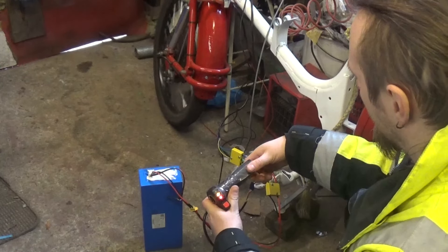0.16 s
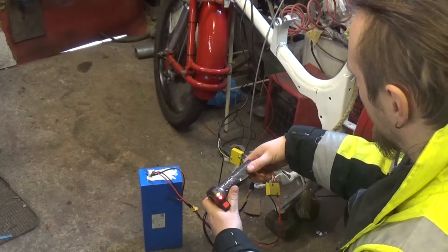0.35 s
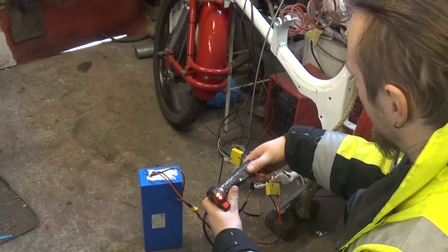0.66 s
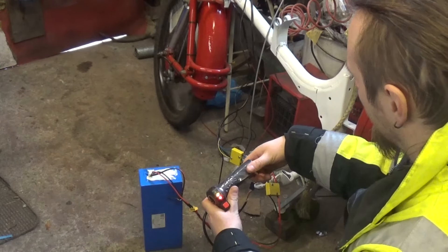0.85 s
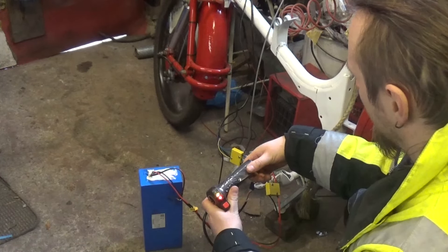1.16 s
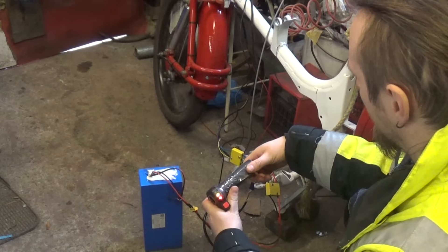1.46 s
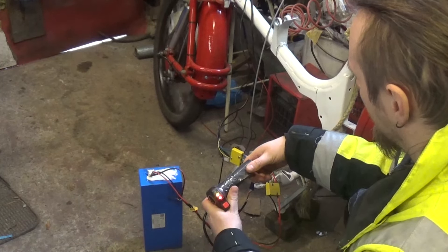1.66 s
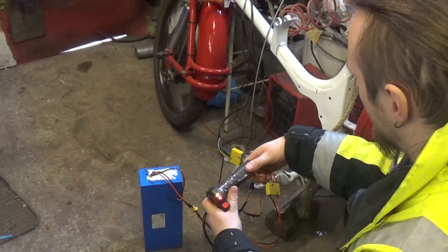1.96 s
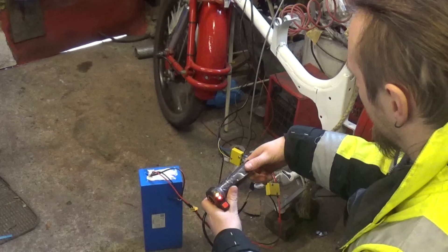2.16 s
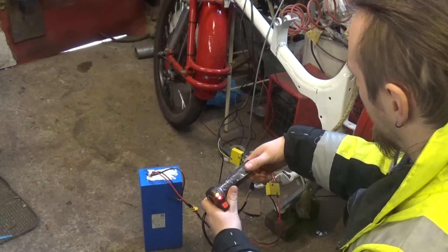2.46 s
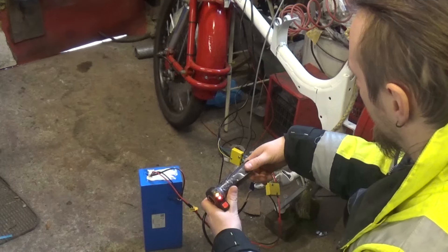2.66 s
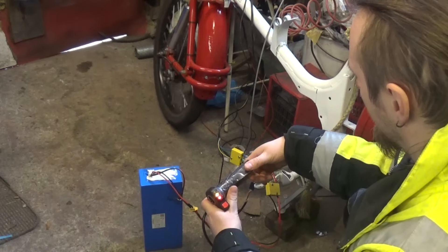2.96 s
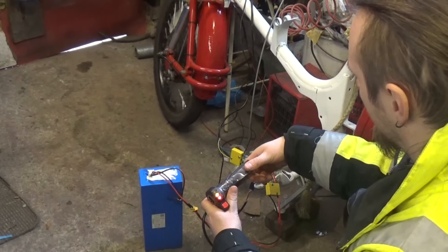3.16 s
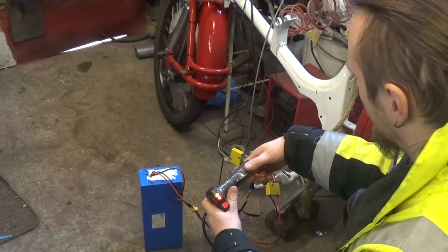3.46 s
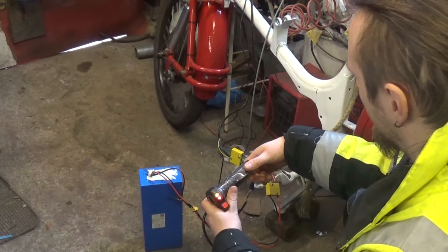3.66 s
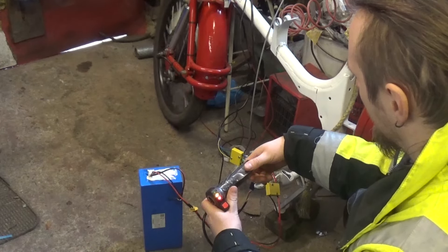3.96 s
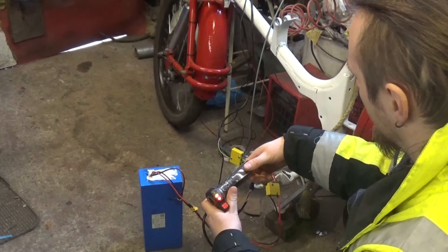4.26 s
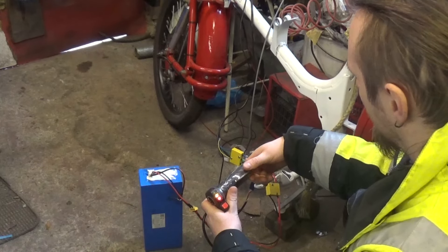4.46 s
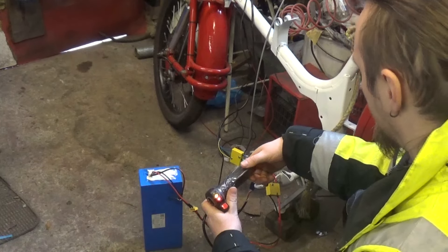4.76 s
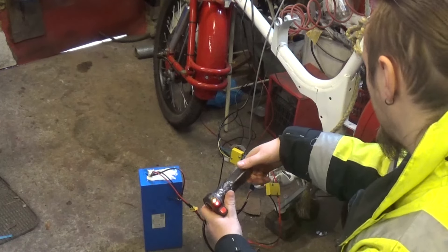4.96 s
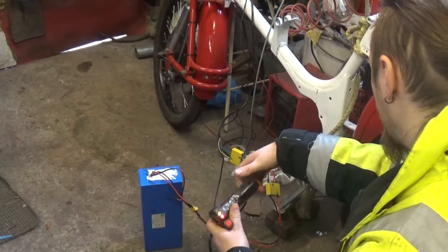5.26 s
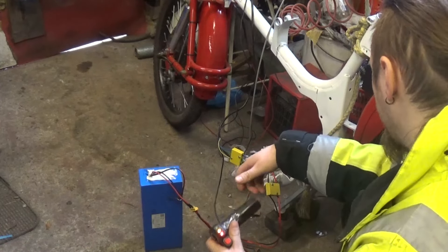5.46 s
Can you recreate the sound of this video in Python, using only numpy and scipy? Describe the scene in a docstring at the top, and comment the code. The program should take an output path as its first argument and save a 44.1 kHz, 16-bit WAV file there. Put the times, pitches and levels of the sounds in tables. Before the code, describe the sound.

An electric wheel motor ticks over quickly and drily, then surges into a loud, metallic growl whose pitch wavers up and down for under two seconds. It falls back to slower, uneven knocking with fine rattle, speeds up slightly, then stops with a dull scrape and two hollow taps. Soft jacket rustle and small crackles follow. Close microphone, small workshop with short reverberation.

```python
"""Slow ticking comes first: an electric wheel motor on a workshop stand, its drive knocking once per step.
A twisted throttle revs it into a wavering growl. Knocks and grinding ring the frame, a fine metallic
rattle rings the hub cover, and the wheel's two main resonances sing over a low rumble.
With the drive off, the wheel scrapes as it runs down and its last two knocks ring hollow; then a jacket
rustles and crackles in the quiet room. Clicks and noise through resonators make the machine."""
import sys
import numpy as np
from scipy import signal
from scipy.fft import rfft, irfft
from scipy.io import wavfile
from scipy.ndimage import uniform_filter1d

SR = 44100
rng = np.random.default_rng(int(sys.argv[2]) if len(sys.argv) > 2 else 0)


def log_audio(samples):
    """Write samples as a 16-bit WAV file to the path given in sys.argv[1]."""
    # one column per channel
    frames = np.atleast_2d(samples).T
    # limit to full scale, then quantise
    limited = np.clip(frames, -1, 1)
    pcm = np.round(limited * 32767).astype(np.int16)
    wavfile.write(sys.argv[1], SR, pcm)


N = 247842

# Drive speed in stretches, the count of steps restarting with each: (time [s], knock rate [1/s])
DRIVE_SPEED = [
    [(.028, 30.7), (.22, 31.9), (.315, 60), (.402, 98.5), (.466, 107.3), (.562, 120), (.632, 97.1),
     (.68, 91), (.728, 91.5), (.81, 115.7), (.858, 122.3), (.9, 123.6), (.95, 123), (1.022, 130),
     (1.18, 101.5), (1.225, 98.4), (1.26, 99), (1.295, 97.8), (1.335, 99.8), (1.41, 96.9), (1.456, 99),
     (1.535, 113), (1.691, 100), (1.77, 97.5), (1.86, 94), (1.919, 90.8), (2.029, 95.6), (2.204, 41),
     (2.4, 25.5)],
    [(2.54, 25.2), (2.7, 24.4), (2.94, 25.9), (3.557, 26), (3.66, 31.5), (3.942, 39)],
    [(3.942, 39), (4.281, 26), (4.47, 18)],
]
# Motor loudness before trims and dips: (time [s], frame level [dB], rattle level [dB])
MOTOR_LEVELS = [(0.0, -35, -33), (0.21, -37.5, -33), (0.43, -23, -27), (0.57, -18.5, -25), (0.72, -23, -25),
                (0.85, -19.5, -26), (1.75, -17.5, -24), (2.15, -28, -26.5), (2.25, -38, -32),
                (2.57, -38, -33.5), (2.64, -35.5, -33), (3.7, -37, -33.5), (3.87, -41, -34),
                (4.02, -35.5, -31.5), (4.48, -38, -33.5), (4.53, -58, -57.5), (4.6, -61, -44.5),
                (4.65, -68, -68), (4.8, -72.5, -80)]
# Single hard knocks: (time [s], blow on the frame [dB], dry snap [dB], cover shake [dB])
HARD_KNOCKS = [(0.497, 11, 25, -37), (0.86, 17, 1, -26), (0.986, 6, 24, -43), (2.03, 17.5, 22, -38),
               (2.823, 3, 13, -34), (2.863, 3, 12, -34), (3.741, 13, 19, -27), (2.939, -14, 9, -33.5),
               (3.13, 6, 6, -40), (3.287, 8, 7, -40), (3.365, -2, 11.5, -45), (3.724, 2, 1, -35),
               (3.782, 0, -13, -36), (3.967, 5, 5, -38), (3.995, 0, -11, -36), (4.141, 7.5, -4, -34),
               (4.434, 3, 6, -35), (4.55, -19, -20, -45.5), (4.591, -19, -17, -53), (4.711, -19, -24, -64)]
# Frame and wheel resonances: (frequency [Hz], width [Hz], relative level [dB])
FRAME_MODES = [(651, 32, -3.5), (755, 35.6, 0), (901, 30, -2.5), (965, 35, -4.5), (1135, 46, -5),
               (1318, 72, -6), (1494, 32.5, -2.5), (1718, 72, -3), (1780, 72, -8), (1888, 51, -4.5),
               (2060, 91, -11)]
# Hub cover resonances: (frequency [Hz], width [Hz], relative level [dB])
HUB_MODES = [(2380, 930, -4.5), (3150, 64, 2), (3293, 17, 3), (3662, 235, 2.5), (4255, 280, 2),
             (4617, 152, 6.5), (5250, 190, 4.5), (5680, 180, 7.5), (5960, 950, 2.5), (6955, 320, 5),
             (7010, 47, 11), (7426, 170, 4.5), (7890, 550, -1), (8860, 710, 1), (10040, 450, -4),
             (10870, 230, -5.5)]
# Dry snap coming back from nearby panels: (delay [ms], level [dB])
PANEL_ECHOES = [(5.5, -7), (10.9, -10)]
# Jacket crackles, peaks before the room: (time [s], peak level [dB], frequency [Hz], decay [ms])
JACKET_CRACKLES = [(4.828, -31, 10000, 0.5), (4.832, -39.5, 5500, 0.55), (4.906, -36, 9430, 1.9),
                   (4.979, -38, 6800, .6), (5.0157, -45, 8500, .6), (5.0454, -41, 7600, .6),
                   (5.058, -33, 9500, .6), (5.095, -37, 7760, 2.1), (5.113, -35, 8100, .8),
                   (5.123, -41, 7660, 1.4), (5.1393, -26.5, 8500, 0.49), (5.168, -37, 6120, 1.5),
                   (5.189, -40, 10200, .6), (5.378, -38, 8500, .6), (5.385, -38, 2960, 3.4)]
# Spectrum of room hiss and jacket rustle: (frequency [Hz], relative level [dB])
RUSTLE_SPECTRUM = [(24, -46.5), (40, -40), (93, -20.5), (569, -3), (829, -7), (1020, -4), (1210, -4.5),
                   (7210, -8), (11000, -15.5)]
# Spectrum of the wheel's rumble: (frequency [Hz], relative level [dB])
RUMBLE_SPECTRUM = [(24, -74.5), (40, -34.5), (91, -31.5), (184, -10.5), (302, -10.5), (356, -3), (437, 0),
                   (470, -2), (610, -65.5), (1030, -120)]
# Dry snap at the start of each knock: (frequency [Hz], width [Hz], level [dB])
SNAP_MODE = [(1400, 1200, -10)]
# Brief level dips, about twice a second under load: (time [s], depth [dB])
LOAD_DIPS = [(0.524, 5.5), (0.999, 6), (1.504, 7.5), (2.064, 4)]
# The wheel's two main resonances: (frequency [Hz], width [Hz], level [dB])
SINGING_MODES = [(595, 80, 0), (762, 55, 0)]
# How loudly those two sing: (time [s], lower resonance [dB], upper resonance [dB])
SINGING_LEVELS = [(0.0, -40, -42), (0.22, -45.5, -41), (0.42, -26, -31), (0.63, -26, -27), (0.69, -35, -28),
                  (0.84, -21, -22.5), (0.95, -18, -22.5), (1.05, -31, -36), (1.09, -23.5, -33.5),
                  (1.14, -26, -24.5), (1.37, -27, -24.5), (1.47, -23, -36.5), (1.56, -31.5, -27.5),
                  (1.69, -23.5, -28), (1.75, -28, -22), (1.85, -26, -27), (1.92, -33, -38.5),
                  (2.0, -29.5, -27), (2.33, -43.5, -38.5), (3.95, -42, -37), (4.02, -34, -42),
                  (4.48, -49, -39.5), (4.66, -80, -84)]
# Thin whistle now and then at low speed: (start [s], length between fades [s], level [dB])
WHISTLE_NOTES = [(0, 0.036, -37.5), (2.63, 0.11, -39.5), (4.434, 0.077, -49)]
# Dull scrape as the wheel runs down, before the room: (time [s], level [dB])
SCRAPE_LEVELS = [(4.46, -80), (4.5, -49), (4.56, -46), (4.64, -49.5), (4.705, -82), (4.715, -49),
                 (4.745, -60), (4.82, -78)]
# Resonances of the scrape: (frequency [Hz], width [Hz], relative level [dB])
SCRAPE_MODES = [(645, 220, -1), (850, 240, -4.5), (1050, 130, -5)]
# Short hollow ring of the last two knocks: (time [s], level at the start [dB])
KNOCK_RINGS = [(4.592, -44), (4.709, -56.5)]
# Colour of that hollow ring: (frequency [Hz], width [Hz], level [dB])
KNOCK_RING_MODE = [(2540, 310, 0)]
# The jacket moving: (start [s], top [s], end [s], height [dB])
JACKET_SWELL = (4.77, 5.04, 5.63, 4.6)
# A sleeve brushing past: (start [s], top [s], end [s], height [dB])
SLEEVE_RISE = (4.6, 5.25, 5.4, 16)
# Colour of the sleeve: (frequency [Hz], width [Hz], level [dB])
SLEEVE_MODE = [(1170, 360, 0)]
# Fine bright crinkling: (start [s], top [s], end [s], height [dB])
CRINKLE_RISE = (4.94, 5.13, 5.22, 12.6)
# Colour of the crinkling: (frequency [Hz], width [Hz], level [dB])
CRINKLE_MODE = [(8300, 3500, 0)]

SLOW_PER_S, FAST_PER_S = 30, 95     # knock rates of ticking over and of full revs
# Clean knocking's share of the power at a steady rate, and the rate of change that halves it
CLEAN_SLOW, CLEAN_FAST, UNSTEADY_SLOW_PER_S, UNSTEADY_FAST_PER_S = .33, .965, .7, 6.5
# The slower the drive, the drier and more uneven each knock: snap gain and spread of strength
SNAP_SLOW_DB, SNAP_FAST_DB, UNEVEN_SLOW_DB, UNEVEN_FAST_DB = 7, 0, 1.8, .9
WAVER_DB, WAVER_PER_S = 1.8, 14     # each frame resonance waxes and wanes on its own
DIP_FALL_S, DIP_RISE_S = 0.01, 0.061
WHISTLE_HZ, WHISTLE_FADE_S = 1778, .03
KNOCK_RING_DECAY_S = 0.022
RUMBLE_SLOW_DB, RUMBLE_FAST_DB, RUMBLE_OFF_S, RUMBLE_FADE_DB_PER_S = -45, -42, 4.457, 77
HISS_DB, SLEEVE_REST_DB, CRINKLE_REST_DB = -59.5, -80.5, -65    # levels outside the swells
RUSTLE_LIKENESS = 0.59      # how alike the two sides are, 1 being identical
ROOM_T60_S, ROOM_DB, SIDE_T60_S, SIDE_DB = 0.17, -14.5, .12, -10.5
CUTOFF_HZ = 11030


def amp(db):
    """Decibels to gain."""
    return 10 ** (np.asarray(db) / 20)


def rms_one(x):
    """Scale to rms 1."""
    return x / np.sqrt(np.mean(x ** 2) + 1e-20)


def in_time(rows):
    """Draw each table column as a curve with one value per sample."""
    s, *columns = np.transpose(rows)
    return [np.interp(np.arange(N) / SR, s, c) for c in columns]


def swell(start, top, end, height_db):
    """A rise and fall in dB, zero outside."""
    return np.interp(np.arange(N) / SR, [start, top, end], [0, height_db, 0])


def resonate(x, modes, waver_db=0):
    """Parallel resonances with alternating signs, each optionally wavering in strength."""
    out = 0
    for k, (hz, width_hz, level_db) in enumerate(modes):
        r = np.exp(-np.pi * width_hz / SR)      # a wider resonance dies sooner
        poles = [1, -2 * r * np.cos(2 * np.pi * hz / SR), r * r]
        gain = amp(level_db)
        if waver_db:
            chance = amp(waver_db * rng.standard_normal(round(N / SR * WAVER_PER_S)))
            places = np.linspace(0, len(chance) - 1, N)
            gain = gain * np.interp(places, np.arange(len(chance)), rms_one(chance))
        ring = signal.lfilter([1 - r * r, 0, r * r - 1], poles, x + 1e-18)
        out = out + (-1) ** k * gain * ring
    return out


def grains(per_s, spread_db):
    """Random clicks of uneven size and sign; rms 1."""
    sizes = amp(spread_db * np.minimum(rng.exponential(1, N), 5)) * rng.choice([-1, 1], N)
    return rms_one(sizes * (rng.random(N) < per_s / SR))


def coloured(points, likeness):
    """Stereo noise of a given spectrum, partly alike on both sides; rms 1."""
    hz = np.maximum(np.fft.rfftfreq(N, 1 / SR), 1)
    points_hz, points_db = np.transpose(points)
    colour = amp(np.interp(np.log(hz), np.log(points_hz), points_db))
    mid, side = irfft(rfft(rng.standard_normal((2, N))) * colour, N)
    alike = np.clip(likeness, 0, 1)
    return rms_one(np.sqrt(1 + alike) * mid + np.sqrt(1 - alike) * side * [[1], [-1]])


def steps():
    """Knocks per second and the running count of steps, restarted at each stretch."""
    per_s, count, t = np.zeros(N), np.zeros(N), np.arange(N) / SR
    for rows in DRIVE_SPEED:
        on = t >= rows[0][0]
        per_s[on] = in_time(rows)[0][on]
        count[on] = np.cumsum(per_s[on]) / SR
    return np.where(per_s > 0, per_s, DRIVE_SPEED[0][0][1]), count


def by_speed(slow, fast):
    """A value that moves from slow, ticking over, to fast at full speed."""
    return slow + (fast - slow) * np.clip((steps()[0] - SLOW_PER_S) / (FAST_PER_S - SLOW_PER_S), 0, 1)


def drive():
    """Each step is a knock; the less steady the speed, the more knocking gives way to grinding."""
    per_s, count = steps()
    change = uniform_filter1d(np.abs(np.gradient(np.log(per_s))) * SR, size=2000)
    unsteady = change / by_speed(UNSTEADY_SLOW_PER_S, UNSTEADY_FAST_PER_S)
    clean = by_speed(CLEAN_SLOW, CLEAN_FAST) / (1 + unsteady ** 2)
    struck = np.diff(np.floor(count), prepend=-1) != 0
    struck[round(DRIVE_SPEED[-1][-1][0] * SR):] = False     # the drive is off, the wheel only coasts
    strength = amp(by_speed(UNEVEN_SLOW_DB, UNEVEN_FAST_DB) * rng.standard_normal(N))
    knocks = struck * strength * np.sqrt(SR / per_s)        # same power at any rate
    stir = signal.lfilter([1], [1, -np.exp(-1 / (0.013 * SR))], struck)     # shaking dies after each knock
    turning = np.arange(N) < MOTOR_LEVELS[-1][0] * SR
    grind = turning * rms_one(grains(3000, 1.6) * (1 + 0.27 * stir))
    return np.sqrt(clean) * knocks, np.sqrt(1 - clean) * grind, stir, turning


def hard_knocks(column):
    """One click per hard knock, as loud as the chosen table column says."""
    clicks = np.zeros(N)
    for row in HARD_KNOCKS:
        clicks[round(row[0] * SR)] = amp(row[column])
    return clicks


def singing(push):
    """The drive keeps the wheel's two main resonances sounding, each at its own level."""
    white = rng.standard_normal(SR)
    out = 0
    for level_db, mode in zip(in_time(SINGING_LEVELS), SINGING_MODES):
        ring = resonate(resonate(amp(level_db) * push, [mode]), [mode])
        out = out + ring / np.std(resonate(resonate(white, [mode]), [mode]))
    return out


def whistle():
    """A steady thin tone that fades in and out."""
    t = np.arange(N) / SR
    on = 0
    for s, hold_s, level_db in WHISTLE_NOTES:
        inside_s = np.minimum(t - s, s + hold_s - t)        # negative during the fades
        on = on + amp(level_db) * np.clip(inside_s / WHISTLE_FADE_S + 1, 0, 1)
    return on * np.sqrt(2) * np.sin(2 * np.pi * WHISTLE_HZ * t)


def ringing_frame(knocks, grind, frame_db):
    """Knocks and grinding ring the frame; knocks also snap drily and echo from nearby panels."""
    scale = np.std(resonate(rng.standard_normal(N), FRAME_MODES + SNAP_MODE))   # evens out resonator gain
    blows = amp(frame_db - 3.5) * knocks / scale
    grinding = amp(frame_db + 6.5) * grind / scale
    snap_gain = amp(by_speed(SNAP_SLOW_DB, SNAP_FAST_DB))
    dry_snap = resonate(snap_gain * blows + hard_knocks(2), SNAP_MODE)
    snap = dry_snap
    for delay_ms, level_db in PANEL_ECHOES:
        snap = snap + amp(level_db) * np.roll(dry_snap, round(delay_ms * SR / 1000))
    ring = resonate(blows + hard_knocks(1) + grinding, FRAME_MODES, WAVER_DB)
    frame = ring + snap + singing(knocks + grind) + whistle()
    band = signal.butter(4, [470, 2120], "band", fs=SR, output="sos")   # tubes radiate neither bass nor treble
    return signal.sosfilt(band, frame)


def hub_rattle(knocks, stir, turning, rattle_db):
    """Fine clicks, stirred up by every knock, ring the hub cover; hard knocks shake it briefly."""
    rattle = turning * rms_one(grains(12000, 2.3) * (1 + 0.52 * stir)) + 0.074 * knocks
    rattle = amp(rattle_db) * rattle / np.std(resonate(rattle, HUB_MODES))
    shake = rng.standard_normal(600) * np.exp(-np.arange(600) / (0.036 * SR))
    for s, _, _, shake_db in HARD_KNOCKS:
        rattle[round(s * SR):][:600] += amp(shake_db) * shake
    return resonate(rattle, HUB_MODES)


def motor():
    """The drive excites frame and hub cover together; its knocks, grinding and rattle dip briefly."""
    dip_db = sum(swell(s - DIP_FALL_S, s, s + DIP_RISE_S, depth_db) for s, depth_db in LOAD_DIPS)
    frame_db, rattle_db = in_time(MOTOR_LEVELS) - dip_db
    knocks, grind, stir, turning = drive()
    frame = ringing_frame(knocks, grind, frame_db)
    return frame + hub_rattle(knocks, stir, turning, rattle_db) + coasting()


def rumble():
    """The wheel rumbles in lumps, louder at speed, and dies away once the drive is off."""
    coasting_s = np.maximum(np.arange(N) / SR - RUMBLE_OFF_S, 0)
    slow_noise = uniform_filter1d(uniform_filter1d(rng.standard_normal(N), size=3000), size=3000)
    lumps_db = 1.2 * rms_one(slow_noise)
    level_db = by_speed(RUMBLE_SLOW_DB, RUMBLE_FAST_DB) - RUMBLE_FADE_DB_PER_S * coasting_s + lumps_db
    return amp(level_db) * coloured(RUMBLE_SPECTRUM, likeness=0.88)


def rustle():
    """Shaped noise for fabric and room air; resonant grains for a brushing sleeve and crinkling."""
    hiss = amp(HISS_DB + swell(*JACKET_SWELL)) * coloured(RUSTLE_SPECTRUM, RUSTLE_LIKENESS)
    sleeve = rms_one(resonate(grains(1200, 3.0), SLEEVE_MODE))
    sleeve = amp(SLEEVE_REST_DB + swell(*SLEEVE_RISE)) * sleeve
    crinkle = rms_one(resonate(grains(2000, 3.2), CRINKLE_MODE))
    crinkle = amp(CRINKLE_REST_DB + swell(*CRINKLE_RISE)) * crinkle
    return hiss + sleeve + crinkle


def coasting():
    """The wheel scrapes on, dull and dying; decaying noise gives the last two knocks a hollow ring."""
    t = np.arange(N) / SR
    decay = 0
    for s, level_db in KNOCK_RINGS:
        decay = decay + amp(level_db) * (t >= s) * np.exp(-np.maximum(t - s, 0) / KNOCK_RING_DECAY_S)
    white = rng.standard_normal(N)
    hollow_ring = resonate(decay * white, KNOCK_RING_MODE) / np.std(resonate(white, KNOCK_RING_MODE))
    scrape = rms_one(resonate(grains(3000, 2.0), SCRAPE_MODES))
    return amp(in_time(SCRAPE_LEVELS)[0]) * scrape + hollow_ring


def crackles():
    """Each snap of the fabric is a short burst of noise in one broad resonance, passed twice."""
    out, t = np.zeros(N), np.arange(400) / SR
    bursts = rng.standard_normal((len(JACKET_CRACKLES), 400))
    for (s, peak_db, hz, decay_ms), burst in zip(JACKET_CRACKLES, bursts):
        band = [(hz, 0.65 * hz, 0)]
        fade = np.exp(-1000 * t / decay_ms) + .12 * np.exp(-t / .005)   # with a faint longer tail
        snap = resonate(resonate(burst * fade, band), band)
        out[round(s * SR):][:400] += amp(peak_db) * snap / np.max(np.abs(snap))
    return out


def workshop(x):
    """Direct sound with one diffuse tail shared by both sides and another of opposite polarity."""
    t = np.arange(round(.4 * SR)) / SR
    tail = rng.standard_normal((2, len(t))) * amp(-60 * t / [[ROOM_T60_S], [SIDE_T60_S]]) * (t > .001)
    tail = tail / np.sqrt(np.sum(tail ** 2, axis=1, keepdims=True))
    mid, side = amp([[ROOM_DB], [SIDE_DB]]) * tail
    mid[0] = 1      # direct sound
    balance = amp([[.35], [-.35]])      # left slightly louder, in dB
    response = mid * balance + side * [[1], [-1]]
    return signal.fftconvolve(x[None], response, axes=1)[:, :N]


def scene():
    """Motor and crackles in the workshop, with rumble and rustle laid over."""
    return workshop(motor() + crackles()) + rumble() + rustle()


def record(dry):
    """A steep low-pass cuts the top."""
    return signal.sosfilt(signal.ellip(12, .5, 70, CUTOFF_HZ, fs=SR, output="sos"), dry)


dry = scene()
out = record(dry)
log_audio(out)
```